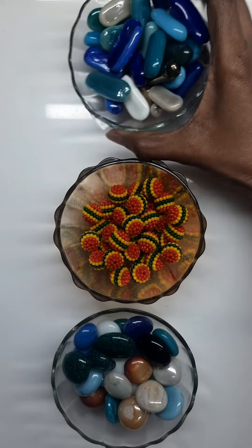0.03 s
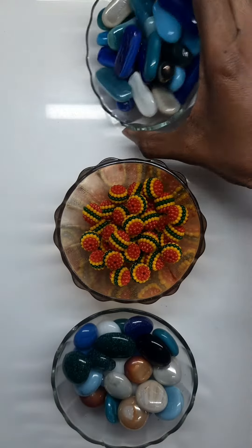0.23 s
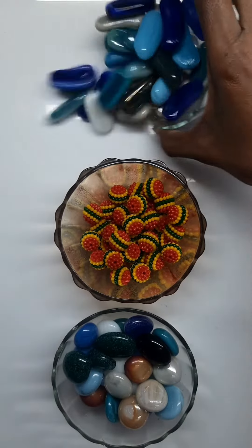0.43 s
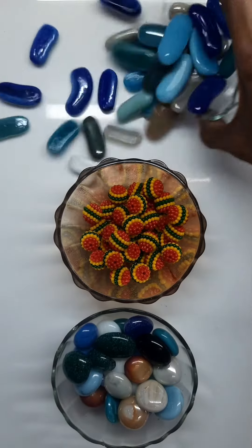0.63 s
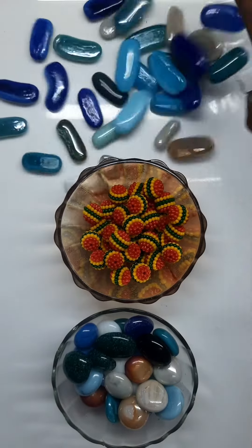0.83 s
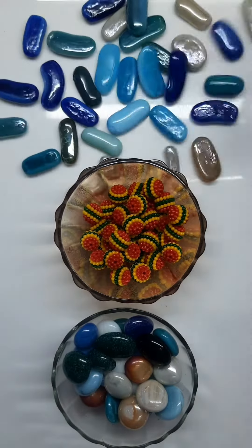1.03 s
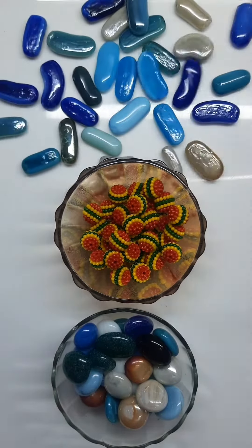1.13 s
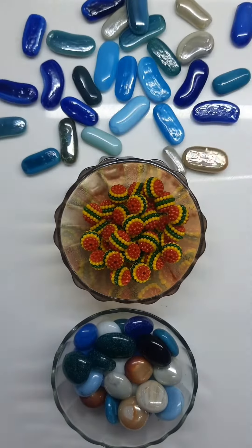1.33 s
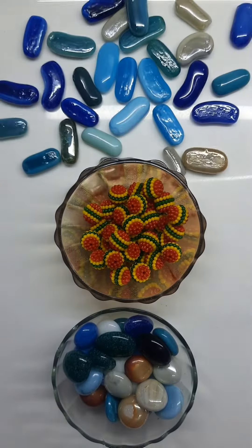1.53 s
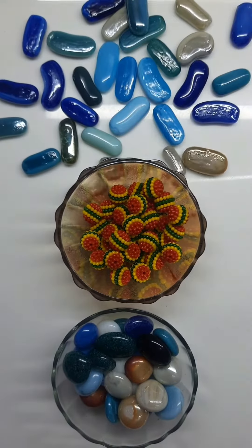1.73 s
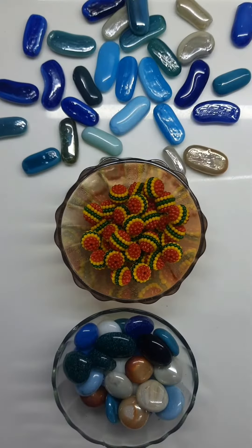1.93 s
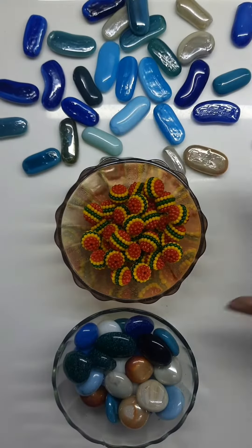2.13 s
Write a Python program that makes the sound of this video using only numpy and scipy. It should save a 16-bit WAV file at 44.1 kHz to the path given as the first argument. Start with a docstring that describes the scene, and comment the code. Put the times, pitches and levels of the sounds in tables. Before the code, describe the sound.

Glass pebbles pour from a bowl and clatter across a table, then a few dull knocks.

```python
"""Glass pebbles poured onto a table

Glass pebbles slide in a tilted glass bowl, pour onto a hard table top and clatter to rest, close to
a phone. Each contact is a sharp click; landings also ring the table. Three low bumps reach the left
microphone. Then the empty bowl is set down with a few dull knocks, in a small bare room."""
import sys
import numpy as np
from scipy import signal
from scipy.fft import rfft, irfft
from scipy.io import wavfile

SR = 44100
rng = np.random.default_rng(int(sys.argv[2]) if len(sys.argv) > 2 else 0)


def transcribe(signal):
    """Save signal, clipped to [-1, 1], as a 16-bit WAV file at the path in sys.argv[1]."""
    frames = np.atleast_2d(signal).T
    limited = np.clip(frames, -1, 1)
    pcm = np.round(limited * 32767).astype(np.int16)
    wavfile.write(sys.argv[1], SR, pcm)


N = 97020
T = np.arange(N) / SR


def amp(db):
    return 10 ** (np.asarray(db) / 20)


def fade(t, t60):
    """Exponential decay, 60 dB down after t60 seconds."""
    return np.exp(-np.log(1000) * t / t60)


def on_log(hz, points):
    """Reads (Hz, value) points on a log-frequency axis."""
    f, v = np.array(points, float).T
    return np.interp(np.log(np.maximum(hz, 1)), np.log(f), v)


def through(x, response):
    """Passes both channels through an impulse response."""
    return signal.fftconvolve(np.atleast_2d(x), np.atleast_2d(response), axes=1)[:, :N]


def eq(x, points, size=4096):
    """Minimum-phase EQ through (Hz, dB) points: no pre-ring ahead of an attack."""
    gain = amp(on_log(np.fft.rfftfreq(size, 1 / SR), points))
    cepstrum = irfft(np.log(gain))
    cepstrum[1:size // 2] *= 2
    cepstrum[size // 2 + 1:] = 0
    return through(x, irfft(np.exp(rfft(cepstrum))))


def ring(x, modes, size=32768):
    """Resonator bank of (Hz, dB, t60) modes; neighbours swing in opposite directions."""
    t = T[:size]
    response = sum((-1) ** k * amp(db) * np.sin(2 * np.pi * hz * t) * fade(t, t60)
                   for k, (hz, db, t60) in enumerate(modes))
    return through(x, response)


def contacts(times, dbs, alike, spike, width=1, decay_s=0.0022, size=2048):
    """A spike and a dying noise burst per contact, panned at random; alike is the L/R correlation."""
    lag_s, pan_db = 0.00016, 2  # per channel, fully to one side
    out, t = np.zeros((2, N + 2 * size)), T[:size]
    for at, db, z in zip(times, dbs, rng.standard_normal((len(times), 4, size))):
        noise = np.sqrt(alike) * z[2] + np.sqrt(1 - alike) * z[:2]
        burst = noise * np.exp(-t / decay_s) * np.sqrt(2 / (decay_s * SR))
        burst[:, 0] += spike
        pan = width * np.tanh(z[3, 0])
        for ch, side in enumerate((1, -1)):
            i = int(np.clip((at - side * pan * lag_s) * SR, 0, N))
            out[ch, i:i + size] += burst[ch] * amp(db + side * pan * pan_db) / np.hypot(1, spike)
    return out[:, :N]


def shower(curve, count, spread_db=2):
    """Times and levels of light contacts, scattered at random along a level curve."""
    t, db = np.array(curve).T
    when = t[0] + (t[-1] - t[0]) * (np.arange(count) + rng.random(count)) / count
    return when, np.interp(when, t, db) + spread_db * rng.standard_normal(count)


# Bass-heavy EQ of the background rumble: f/Hz, gain/dB
RUMBLE_EQ = [(25, -22.5), (50, -7.5), (85, 4.5), (160, -9.5), (350, -10.5), (750, -11), (1100, -22),
             (3000, -34.5), (15000, -41)]
# Its fader ride: t/s, level/dB
RUMBLE_RIDE = [(.1, -61.5), (1.4, -74)]
def low_rumble():
    """Faint low rumble, louder at first like handling noise, sinking to quiet room tone."""
    noise = rng.standard_normal((3, N))
    rumble = eq(noise[2] + 0.66 * noise[:2], RUMBLE_EQ)
    return rumble / rumble.std() * amp(np.interp(T, *np.array(RUMBLE_RIDE).T))


# Reverb time of the small bare room: f/Hz, t60/s
ROOM_T60 = [(100, 0.57), (280, 0.4754), (430, 0.5163), (750, 0.42), (1200, 0.43), (3000, 0.55),
            (7000, 0.3243), (14000, 0.26)]
def room_tail(predelay_s=0.0074, build_s=0.0026, narrow_below_hz=990, size=32768):
    """Diffuse echo of the room: the treble dies first, the bass is alike in both ears."""
    t, hz = T[:size], np.fft.rfftfreq(size, 1 / SR)
    centres = np.geomspace(60, 16000, 9)
    mid, side = rfft(rng.standard_normal((2, size)))
    alike = 1 / (1 + (hz / narrow_below_hz) ** 2)
    stereo = mid * np.sqrt(1 + alike) + np.array([[1], [-1]]) * side * np.sqrt(1 - alike)
    tail = 0
    for centre, weights in zip(centres, np.eye(len(centres))):
        band = irfft(stereo * on_log(hz, list(zip(centres, weights))))
        tail += band * fade(t, on_log(centre, ROOM_T60))
    tail *= np.clip((t - predelay_s) / build_s, 0, 1)
    return tail / np.sqrt(np.sum(tail ** 2) / 2)


# Low bumps at the left microphone: t/s, envelope peak/dB
BUMPS = [(0.449, -11.5), (0.696, -21.5), (0.935, -14)]
def mic_bumps(hz=68, rise_s=0.0023, right_db=-23):
    """Soft low jolts of about a cycle, mostly on the left."""
    out = 0
    for at, db in BUMPS:
        age = np.maximum(T - at, 0)
        envelope = age / rise_s * np.exp(1 - age / rise_s)
        out += amp(db) * envelope * np.sin(2 * np.pi * hz * age)
    return out * amp([[0], [right_db]])


# Resonances of the table top: f/Hz, relative level/dB, t60/s
TABLE_MODES = [(113, -21, 0.24), (188, -15.5, 0.11), (235.56, 1, 1.0), (244.6, -3.5, .45),
               (297.7, -0.5, .55), (419, -4, 0.43), (443, -5.5, 0.5), (484, -12, .3), (477, -19, .35),
               (547, -12.5, .3), (633, -6, .3), (702, -6.5, 0.68), (742, -6.5, .35), (990, -16.5, .3),
               (1025, -13.5, .3), (2024, -24.5, .25)]
def table_ring(blows, from_hz=0, below_hz=np.inf):
    """The struck table rings on in those of its modes that lie in the given range."""
    return ring(blows, [mode for mode in TABLE_MODES if from_hz <= mode[0] < below_hz])


# Bowl knocks, relative layer levels: t/s, thud/dB, edge/dB, ring/dB, boom/dB
KNOCKS = [(1.645, -4.5, -3.5, 1, -10.5), (1.8324, 1, 0, -5.5, 5.5), (1.8754, -1, -2, -5.5, -2.5),
          (1.898, -7.5, -15.5, -11, -0.5), (1.99, -22, -26, -25, -31)]
# EQs of the dull thud and its hard edge: f/Hz, gain/dB
THUD_EQ = [(15, -78), (30, -55), (60, -21), (110, -5), (200, -6.5), (280, 10.5), (370, -4.5), (450, 7.5),
           (560, -3), (800, -5), (1000, 0.5), (1250, -22.5), (2300, -26), (5000, -69), (15000, -69)]
EDGE_EQ = [(30, -40.5), (200, -5), (900, 5), (2300, -4.5), (4000, -14), (7000, -20), (10000, -32),
           (16000, -40)]
def bowl_set_down(crossover_hz=270):
    """The bowl touches, lands and rocks: the first touch rings the table freely, heavy blows boom."""
    at, thud_db, edge_db, ring_db, boom_db = np.array(KNOCKS).T
    thud = contacts(at, thud_db, alike=0.85, spike=1.2, width=0.24, decay_s=0.005)
    edge = contacts(at, edge_db, alike=0.28, spike=0.29, width=0.266, decay_s=0.007)
    ring_push, boom_push = (contacts(at, db, alike=1, spike=7.5, width=0.14, decay_s=0.005)
                            for db in (ring_db, boom_db))
    knocks = amp(19) * eq(thud, THUD_EQ) + amp(8) * eq(edge, EDGE_EQ)
    rings = table_ring(ring_push, from_hz=crossover_hz) + table_ring(boom_push, below_hz=crossover_hz)
    return knocks, amp(-32.5) * rings


# Bright pings on top of the clatter: t/s, f/Hz, level/dB, t60/s
PINGS = [(.284, 11750, -25.5, 0.076), (.309, 11400, -25.5, 0.075), (.374, 9100, -15, 0.075),
         (.4033, 11600, -25.5, 0.14), (.444, 6050, -20.5, 0.035), (.621, 6150, -14, 0.047),
         (.644, 6100, -14.5, 0.03), (.697, 5930, -9.5, 0.019)]
def glass_pings():
    """A few hits ring on briefly as bright glassy pings."""
    out = np.zeros((2, N))
    for (at, hz, db, t60), phase in zip(PINGS, np.pi * rng.random((len(PINGS), 2, 1))):
        age = np.maximum(T - at, 0)
        out += amp(db) * (T >= at) * np.sin(2 * np.pi * hz * age + phase) * fade(age, t60)
    return out


def pebble_tinks(times, dbs, low_hz=3287, high_hz=10930, decay_s=0.002, gain_db=-30, size=1024):
    """Each collision has its own glassy note, a few milliseconds long, at a random pitch."""
    out, t = np.zeros((2, N + size)), T[:size]
    for at, db, draw in zip(times, dbs, rng.random((len(times), 3))):
        hz = low_hz * (high_hz / low_hz) ** draw[0]
        note = np.sin(2 * np.pi * (hz * t + draw[1:, None]))
        i = int(np.clip(at * SR, 0, N))
        out[:, i:i + size] += amp(db + gain_db) * note * np.exp(-t / decay_s)
    return out[:, :N]


# Accent clinks in the bowl, then the swell of light contacts under them: t/s, relative level/dB
CLINKS = [(0.168, -44.5), (0.2019, -18), (.223, -7.5), (0.233, -16), (0.2404, -4.5), (.2505, -10),
          (0.264, -12), (0.279, -6), (0.285, -4.5), (0.289, -3), (0.3043, 4.5), (0.31, -4.5), (.334, -3.5),
          (.348, -3), (.366, -4.5), (0.372, -0.5), (0.3779, 0.5), (.380, 0.5), (.393, -2.5), (0.4226, 1.5),
          (.435, -4), (0.447, 5.5)]
SLIDE_SWELL = [(.21, -37), (.26, -15.5), (.30, -9.5), (.375, -7.5), (.42, -20), (.48, -11), (.56, -24.5),
               (.65, -8.5), (.76, -20)]
# Bright glass-on-glass EQ: f/Hz, gain/dB
CLINK_EQ = [(30, -59.5), (400, -27), (1000, -12.5), (1800, -5.5), (2300, -10.5), (2900, -0.5), (4700, -4.5),
            (6300, 0), (9000, -6), (13000, -9), (16000, -18.5)]
# Resonances of the glass bowl: f/Hz, relative level/dB, t60/s
BOWL_MODES = [(2837, -9, .07), (3618, -7, .08), (5790, -5, .08), (6050, -5, .08), (6288, -5, .08),
              (6665, -5, .09), (7935, -9, .05), (9300, -7, .05), (11605, -11, .16), (11760, -5, .08),
              (12820, -9, .05), (15150, -11, .08)]
def pebbles_in_bowl():
    """Pebbles slide and collide, and the bowl rings faintly."""
    at, db = np.hstack([np.array(CLINKS).T, shower(SLIDE_SWELL, count=280)])
    hits = contacts(at, db, alike=0.23, spike=0.15, size=512)
    bowl = amp(-39.5) * ring(hits, BOWL_MODES)
    return amp(12.5) * (eq(hits, CLINK_EQ) + bowl + pebble_tinks(at, db))


# Accent hits on the table and other pebbles, relative layer levels: t/s, click/dB, clack/dB, thump/dB
LANDINGS = [(.4033, -15, 12.5, 10.5), (.460, 2.5, -3.5, -2), (.469, -2.5, 2.5, -3.5),
            (0.4887, -1.5, 0, -2.5), (0.5112, 5, -0.5, -5), (.533, 0, -0.5, -10), (0.55, -2.5, 1, -8),
            (.561, -13.5, 0.5, -6), (.577, 2.5, -0.5, 7), (.595, 1.5, -2.5, -2), (.600, 3.5, -4, -2.5),
            (.610, -6, -1.5, -6), (0.6186, 2, 7, 8.5), (.644, 1, -1, -6.5), (.652, 2, -10, -7.5),
            (0.662, -6.5, -2.5, 4.5), (0.677, -4.5, -1, -2), (.697, 3, -7, 8.5), (0.741, -3, -10.5, -2),
            (0.747, -1, -7, -7), (0.772, -2.5, -5, 0.5), (0.7839, 0.5, -4, -9), (0.791, 5.5, -6, -9),
            (0.803, -2.5, -5.5, -3), (0.819, -1.5, -3, 1), (0.851, 1, -11, -9.5), (.871, 5, 2, 0),
            (0.89, -1.5, -1.5, -6), (.899, 0, -3, -8), (.908, 0, -7, -2.5), (.913, -8, 4.5, 1),
            (.934, 0, -4.5, 7.5), (.952, -6, -3.5, -1.5), (.967, 3.5, 5, -14.5), (.987, 0, -2, -1.5),
            (1.003, -4.5, -6, -3), (1.0481, 1.5, -3, -5), (1.0691, -0.5, -2.5, -3.5), (1.081, -14, -5, -7),
            (1.094, -35, -4, -7), (1.149, 0.5, -3, 1), (1.1626, -12, -10.5, -16), (1.265, -11, -8, -15),
            (1.2815, -14, -12, -18), (1.296, -40, -27, -18), (1.52, -55.5, -43, -45),
            (1.554, -58, -41, -48)]
# Swell of the light bounces between them: t/s, relative level/dB
BOUNCE_SWELL = [(.43, -11.5), (.47, -2), (.52, -16), (.57, -12), (.63, -6.5), (.68, -4.5), (.75, -9),
                (.82, -5), (.89, -6), (.98, -8.5), (1.04, -12), (1.12, -25)]
# EQs of a landing's top (click), mids (clack) and body (thump): f/Hz, gain/dB
CLICK_EQ = [(200, -33.5), (1200, -11.5), (2500, 0.5), (4000, -3.5), (6200, -1), (8500, -2.5), (10500, -8.5),
            (16000, -10)]
CLACK_EQ = [(30, -54.5), (250, -26), (450, -7), (650, -10), (850, -3.5), (1100, 2), (1500, -3.5),
            (1850, -3), (2400, -5), (4000, -14), (12000, -48.5)]
THUMP_EQ = [(15, -61), (60, -19), (120, -16), (190, -5.5), (265, 0), (350, -6.5), (440, -3), (650, -18),
            (1200, -23), (4000, -43.5), (12000, -71)]
def pebbles_on_table():
    """Pebbles land and bounce: a glassy click, the clack of the surface, a thump that rings the top."""
    accents = np.array(LANDINGS).T
    light_at, light_db = shower(BOUNCE_SWELL, count=170)
    bounces = [light_at, light_db, light_db - 0.5, light_db + 1.5]
    at, click_db, clack_db, thump_db = np.hstack([accents, bounces])
    clicks = contacts(at, click_db, alike=0.7, spike=0.08, size=512)
    clacks = contacts(at, clack_db, alike=0.97, spike=0.7, width=0.7, size=768)
    thumps = contacts(at, thump_db, alike=0.93, spike=1.5, width=0.4, size=768)
    glass = amp(10.5) * (eq(clicks, CLICK_EQ) + pebble_tinks(at, click_db))
    surface = amp(15.5) * eq(clacks, CLACK_EQ)
    body = amp(14.5) * eq(thumps, THUMP_EQ) + amp(-48) * table_ring(thumps)
    return glass + surface + body


def scene():
    """Pebbles and knocks with their reverb, over bumps and a faint rumble."""
    knocks, rings = bowl_set_down()
    clatter = pebbles_in_bowl() + pebbles_on_table() + glass_pings()
    send = amp(-4) * clatter + amp(-2.5) * knocks
    reverb = through(send, room_tail())
    return clatter + knocks + rings + reverb + mic_bumps() + low_rumble()


def record(dry):
    """The phone drops the deepest bass, clips at full scale and cuts the top."""
    low_cut = signal.butter(2, 44, "high", fs=SR, output="sos")
    high_cut = signal.ellip(8, 0.2, 70, 15800, fs=SR, output="sos")
    clipped = np.clip(signal.sosfilt(low_cut, dry), -1, 1)
    return signal.sosfilt(high_cut, clipped)


dry = scene()
out = record(dry)
transcribe(out)
```